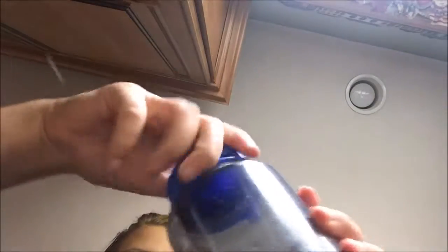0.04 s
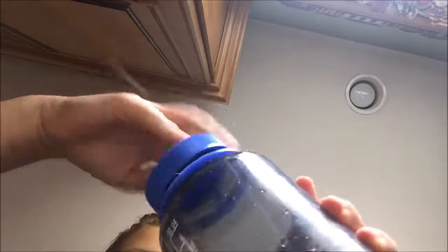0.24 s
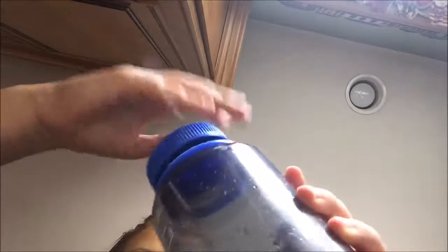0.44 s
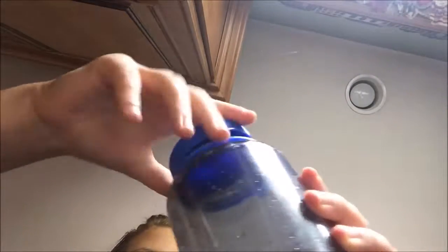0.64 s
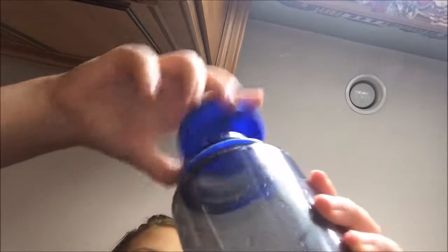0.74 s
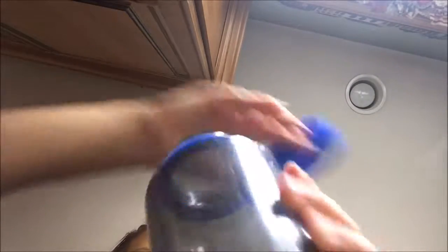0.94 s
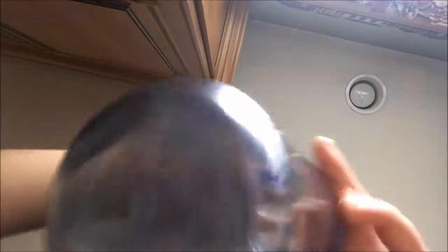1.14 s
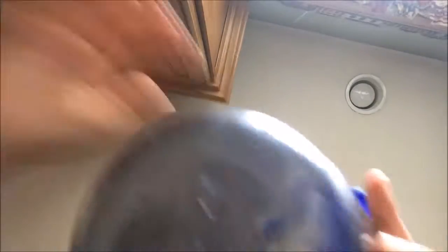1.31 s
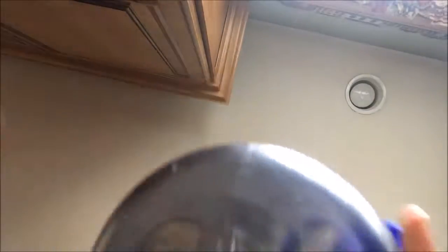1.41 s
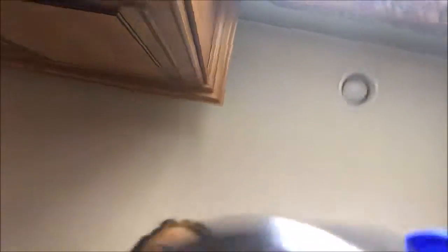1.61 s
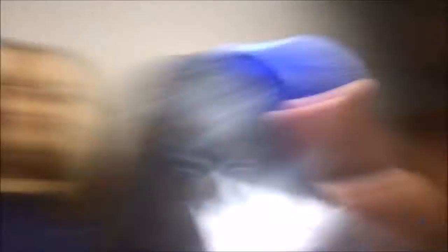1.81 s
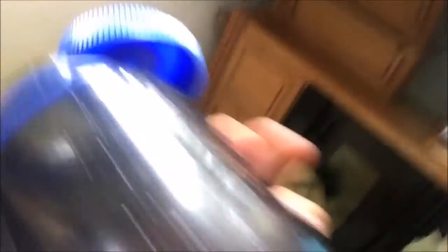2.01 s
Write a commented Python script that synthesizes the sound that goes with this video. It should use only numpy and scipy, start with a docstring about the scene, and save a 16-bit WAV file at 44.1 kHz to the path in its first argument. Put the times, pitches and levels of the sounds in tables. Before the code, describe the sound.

A plastic bottle cap twists and snaps open, then taps against the handled bottle.

```python
"""Sharp plastic clicks, close up in a kitchen: a hand unscrews the cap of a hard water bottle.
The thread rubs and drones, the cap snaps free, and the air in the open bottle rings with a hollow note.
The loose cap ticks and bounces on the bottle's wall; then the bottle is moved about,
with dull bumps, sliding fingers and a short stick-slip judder."""
import sys
import numpy as np
from scipy import signal
from scipy.fft import rfft, irfft, next_fast_len
from scipy.io import wavfile
from scipy.ndimage import map_coordinates

SR = 44100
rng = np.random.default_rng(int(sys.argv[2]) if len(sys.argv) > 2 else 0)


def store_wav(level_fs):
    """Save 16-bit WAV to argv[1]."""
    pcm = np.round(np.clip(np.atleast_2d(level_fs), -1, 1) * 32767)
    wavfile.write(sys.argv[1], SR, pcm.T.astype(np.int16))


N = 90449
T = np.arange(N) / SR
AGE = T[:SR // 3]  # seconds since a hit

# the cap catching on its thread (time [s], level [dB], treble [dB])
CLICKS = [(0.0229, -20, -1.5), (.0332, -10, 1.5), (0.11, -28.5, 10.5), (.110, -19.5, -0.5),
          (.1225, -36, 5.5), (0.1507, -27.5, -13), (0.2345, -20.5, -3), (0.2367, -17, -17),
          (0.3212, -32, 5), (.353, -28.5, -2), (.366, -29, -11.5), (0.3829, -19, -9.5), (.386, -16, -9.5),
          (.402, -24.5, -16), (0.43, -25.5, -15.5), (.458, -26, 1), (0.4926, -25.5, -9.5),
          (0.6657, -4.5, 1), (.675, -11.5, -5), (0.6862, -18.5, -4), (0.7956, -23.5, 3)]
# click EQ (frequency [Hz], gain [dB])
CLICK_EQ = [(60, -24.5), (190, -6), (320, -3), (650, -11.5), (1550, -0.5), (2900, -9.5), (3400, -18.5),
            (4600, -16.5), (8200, -29), (13500, -34), (16000, -41)]
# click tail (frequency [Hz], T60 [s])
CLICK_DECAY = [(200, 0.063), (12000, 0.07)]
# ring of the closed bottle (frequency [Hz], level [dB], T60 [s])
SHELL_MODES = [(1012, 6, 0.074), (1314, -11, 0.027), (1544, 4.5, 0.091), (1803, -5, .17), (2056, 0, 0.15),
               (2526, 1, 0.09), (4640, -3.5, 0.042)]
# thread friction (time [s], level [dB])
RUB_FADER = [(.28, -48), (.375, -45.5), (.405, -31), (.445, -57), (.53, -50.5), (.6, -79.5), (.66, -51),
             (.75, -48), (.85, -74.5)]
# friction EQ (frequency [Hz], gain [dB])
RUB_EQ = [(60, -25), (300, 4.5), (750, -4.5), (1500, 3), (2900, -5), (3500, -11), (6500, -9.5), (8500, -30)]
# the bottle droning under the turning cap (time [s], level [dB], pitch [Hz])
DRONE = [(.33, -52.5, 221), (.37, -36.5, 223.8), (.425, -35.5, 214.2), (.465, -45, 206.5), (.53, -39, 192),
         (.59, -58.5, 126.6), (.68, -46, 111), (.85, -88, 124)]
# taps of cap and strap (time [s], level [dB], low pitch [Hz], high pitch [Hz])
TICKS = [(0.1565, -25.5, 6340, 7000), (0.974, -46.5, 5900, 6500), (1.0263, -28.5, 1830, 6380),
         (1.0385, -22.5, 2650, 4200), (1.158, -41.5, 1870, 1950), (1.2308, -34, 1720, 2580),
         (1.2428, -38, 2430, 3980), (1.279, -29, 3020, 3950)]
# tick EQ (frequency [Hz], gain [dB])
TICK_EQ = [(1100, -9), (1600, 11), (2200, 1), (6800, -9), (8500, -17)]
# tail of struck plastic (frequency [Hz], T60 [s])
PLASTIC_DECAY = [(300, 0.1), (10000, 0.037)]
# handling bumps (time [s], level [dB], pitch [Hz], rise [s])
BUMPS = [(.162, -30.5, 163, 0.0046), (0.688, -30, 154.1, 0.0068), (1.689, -26.5, 78.7, 0.012),
         (1.7334, -11, 158, 0.0046)]
# EQ of the heaviest bump's thud (frequency [Hz], gain [dB])
THUD_EQ = [(60, -4), (300, -2), (560, 3), (1500, -33.5), (4000, -81)]
# air resonance of the bottle (time [s], level [dB])
NECK_FADER = [(.77, -64), (.805, -42.5), (.86, -46.5), (1.0, -83.5), (1.085, -55), (1.2, -80), (1.48, -41),
              (1.54, -56), (2.01, -63.5), (2.04, -39.5)]
# cap bounces (time [s], level [dB])
KNOCKS = [(1.3396, -16.5), (1.3857, -25.5), (1.435, -36), (1.4913, -42.5)]
# ring of the open bottle's wall (frequency [Hz], level [dB], T60 [s])
WALL_MODES = [(293.7, -0.5, 0.17), (934, -6.5, 0.076), (961, 4, 0.074), (1570, -13, 0.11), (1710, 0, 0.034),
              (1994, -8, 0.093), (2770, -11.5, 0.066), (3120, -30, 0.05)]
# knock EQ (frequency [Hz], gain [dB])
KNOCK_EQ = [(60, -42), (300, 6), (540, -13.5), (950, -5.5), (3500, -12.5), (4500, -32.5), (10000, -55)]
# sliding fingers (time [s], level [dB])
SLIDE_FADER = [(1.59, -98.5), (1.67, -40.5), (1.78, -67.5), (1.9, -42.5), (1.94, -76)]
# slide EQ (frequency [Hz], gain [dB])
SLIDE_EQ = [(30, 0.5), (80, 21), (950, -0.5), (1800, -17), (15000, -37)]
# brushes of the hand (time [s], half-length [s], level [dB])
SCRAPES = [(1.643, 0.022, -61.5), (1.862, .014, -56.5), (1.9, 0.013, -56.5)]
# brush EQ (frequency [Hz], gain [dB])
SCRAPE_EQ = [(2000, -8.5), (3300, 13.5), (6800, 4.5), (8500, -7)]
# slips of the shifted bottle (time [s], level [dB])
SLIPS = [(1.837, -24), (1.8437, -24), (1.85, -24.5), (1.865, -23.5), (1.871, -29)]
# ring of a slip (frequency [Hz], level [dB], T60 [s])
JUDDER_MODES = [(180, 2, 0.055), (608, 4, 0.035), (890, -4, 0.014)]
# slip EQ (frequency [Hz], gain [dB])
SLIP_EQ = [(50, -15), (180, 1.5), (900, 5), (1400, -6.5), (2900, -15.5), (10000, -61.5)]
# noise floor EQ (frequency [Hz], gain [dB])
FLOOR_EQ = [(25, -25), (72, 4.5), (300, 3.5), (3000, -19), (15500, -29)]
# reverb EQ (frequency [Hz], gain [dB])
ROOM_EQ = [(80, -10), (2000, -3), (14000, 3)]


def amp(db):
    """Decibels to gain."""
    return 10 ** (np.asarray(db) / 20)


def unit(x):
    """x at rms 1."""
    return x / np.sqrt(np.mean(x ** 2) + 1e-20)


def along(points, hz):
    """Read (frequency [Hz], value) points on a log axis."""
    f, v = np.transpose(points)
    return np.interp(np.log(hz + 1), np.log(f + 1), v)


def curves(rows):
    """An automation curve for each column after the time."""
    s, *cols = np.transpose(rows)
    return [np.interp(T, s, c) for c in cols]


def wobble(rate):
    """A smooth random curve, rate knots a second."""
    return map_coordinates(rng.standard_normal(N // 20), [T * rate], mode="wrap")


def equalise(x, eq):
    """Minimum-phase EQ from a table, or from a function of Hz giving dB."""
    m = 2 * next_fast_len(len(x))
    hz = np.fft.rfftfreq(m, 1 / SR)
    gain_db = eq(hz) if callable(eq) else along(eq, hz)
    cepstrum = irfft(np.log(amp(gain_db) + 1e-6))
    cepstrum[1:m // 2] *= 2
    cepstrum[m // 2 + 1:] = 0
    return irfft(rfft(x, m) * np.exp(rfft(cepstrum)))[:len(x)]


def shelves(x, bass_db, treble_db, bass_hz=700, treble_hz=3500):
    """Low and high shelving EQ."""
    below = lambda hz, corner: 1 / (1 + (hz / corner) ** 4)
    return equalise(x, lambda hz: bass_db * below(hz, bass_hz) + treble_db * (1 - below(hz, treble_hz)))


def noise(eq):
    """Steady coloured noise at rms 1."""
    return unit(equalise(rng.standard_normal(N), eq))


def noise_tail(decay, size):
    """Noise in which each frequency dies at its own speed."""
    hz, t, spectrum = signal.stft(rng.standard_normal(size), SR, nperseg=128)
    fade = amp(-60 * t / along(decay, hz)[:, None])
    return signal.istft(spectrum * fade, SR, nperseg=128)[1][:size]


def swell(rise_s):
    """An envelope that peaks at 1 after rise_s, then dies."""
    return AGE / rise_s * np.exp(1 - AGE / rise_s)


def contact(eq, decay, ring_db):
    """A sharp pulse, a crack of tiny slips and the dense ringing behind it."""
    pulse = equalise(1. * (AGE == 0), eq)
    crack = amp(-9.5) * swell(rise_s=0.00079) * rng.standard_normal(len(AGE))
    rough = equalise(crack + amp(ring_db) * noise_tail(decay, len(AGE)), eq)
    return pulse / abs(pulse).max() + 1.535 * rough / np.linalg.norm(pulse)


def ringing(modes, attack_s):
    """Damped modes, struck a little differently each time."""
    ring = 0
    for hz, db, t60 in modes:
        envelope = amp(db + 1.5 * rng.normal() - 60 * AGE / t60)
        detuned = hz * (1 + .004 * rng.normal())
        ring += envelope * np.sin(2 * np.pi * (detuned * AGE + rng.random()))
    return ring * (1 - np.exp(-AGE / attack_s))


def placed(events):
    """A track from (time [s], level [dB], sound) events."""
    track = np.zeros(N + SR)
    for s, db, sound in events:
        track[round(s * SR):][:len(sound)] += amp(db) * sound
    return track[:N]


def cap_clicks(flex_hz=1796, bass_trade=.33):
    """The cap flexes and jumps on its thread, ringing the closed bottle; dull clicks are fuller."""
    flex = amp(-6) * swell(rise_s=0.00073) ** 2 * np.cos(2 * np.pi * flex_hz * AGE)

    def snap():
        hit = amp(-1.5) * contact(CLICK_EQ, CLICK_DECAY, ring_db=-17.5)
        return flex + hit + amp(-23.5) * ringing(SHELL_MODES, attack_s=0.00028)
    return placed((s, db, shelves(snap(), -bass_trade * treble, treble)) for s, db, treble in CLICKS)


def thread_rub(grains_per_s=700, centre_hz=2550, spread_octaves=.55, ring_cycles=16):
    """Gritty friction in the thread: clumps of tiny pitched slips over hiss."""
    draws = rng.random((round(grains_per_s * N / SR), 2))
    pitches = centre_hz * 2 ** (spread_octaves * rng.standard_normal(len(draws)))
    t = AGE[:SR // 50]
    grain = lambda hz: np.sin(2 * np.pi * hz * t) * amp(-60 * hz * t / ring_cycles)
    grit = placed((when * N / SR, -10 * soft, grain(hz)) for (when, soft), hz in zip(draws, pitches))
    friction = unit(grit) + .7 * rng.standard_normal(N)
    clumps = amp(3 * wobble(rate=170))
    db, = curves(RUB_FADER)
    return amp(db) * unit(equalise(friction * clumps, RUB_EQ))


def cap_drone():
    """The turning cap draws a rough, sinking drone from the bottle."""
    db, hz = curves(DRONE)
    phase = 2 * np.pi * np.cumsum(hz) / SR
    partial = lambda k: wobble(130 * k) * np.sin(k * phase) + wobble(130 * k) * np.cos(k * phase)
    return amp(db) * unit(partial(1) + .45 * partial(2))


def cap_ticks(width_octaves=.25, skirt_db=-12, t60=.022):
    """Light taps; where it is touched, the cap rings mostly at two of its pitches."""
    away = lambda hz, centre: 1 - np.exp(-.5 * (np.log2((hz + 1) / centre) / width_octaves) ** 2)

    def tick(low, high):
        eq = lambda hz: along(TICK_EQ, hz) + skirt_db * away(hz, low) * away(hz, high)
        tap = amp(-5) * contact(eq, PLASTIC_DECAY, ring_db=-12)
        return tap + amp(-11) * ringing([(low, 0, t60), (high, 0, t60)], attack_s=.0003)
    return placed((s, db, tick(low, high)) for s, db, low, high in TICKS)


def handling_bumps(thud_s=1.7318, thud_db=-24.5):
    """The handled bottle gives low, round bumps, the heaviest layered with a soft thud."""
    bumps = [(s, db, swell(rise) ** 2 * np.sin(2 * np.pi * hz * AGE)) for s, db, hz, rise in BUMPS]
    thud = contact(THUD_EQ, decay=[(300, 0.061)], ring_db=-2.5)
    return placed(bumps + [(thud_s, thud_db, thud)])


def neck_note(open_hz=292, capped_drop_hz=47, lift_s=0.66, glide_s=0.0354):
    """The hollow note of the air in the bottle, rising as the cap clears the neck."""
    db, = curves(NECK_FADER)
    gain = amp(db + 1.5 * wobble(rate=50))
    hz = open_hz - capped_drop_hz * np.exp(-np.maximum(T - lift_s, 0) / glide_s)
    hz += 7 * wobble(rate=50)
    return gain * unit(np.sin(2 * np.pi * np.cumsum(hz) / SR))


def cap_knocks(dulling=0.56, low_cut_hz=150):
    """The hanging cap bounces on the open bottle's wall; softer bounces are duller."""
    blow = lambda: ringing(WALL_MODES, attack_s=0.0015) + contact(KNOCK_EQ, PLASTIC_DECAY, ring_db=-8)
    hardest = max(db for s, db in KNOCKS)
    wall = placed((s, db, shelves(blow(), 0, dulling * (db - hardest), treble_hz=1600))
                  for s, db in KNOCKS)
    return signal.sosfilt(signal.butter(2, low_cut_hz, "highpass", fs=SR, output="sos"), wall)


def finger_slide():
    """Fingers slide over the plastic with a dark, uneven rustle."""
    db, = curves(SLIDE_FADER)
    return amp(db + 2.5 * wobble(rate=90)) * noise(SLIDE_EQ)


def skin_swish():
    """Soft, high scrapes of skin on plastic."""
    return noise(SCRAPE_EQ) * sum(amp(db) * np.exp(-((T - s) / width) ** 2) for s, width, db in SCRAPES)


def judder():
    """The shifted bottle sticks and slips in a quick stutter."""
    hit = lambda: contact(SLIP_EQ, PLASTIC_DECAY, ring_db=-13)
    return placed((s, db, hit() + amp(-0.5) * ringing(JUDDER_MODES, attack_s=0.00069)) for s, db in SLIPS)


def kitchen_reverb(send, build_s=0.0053):
    """The kitchen's short echo; the lows hang longest."""
    tail = noise_tail(decay=[(150, 1), (2000, 0.46), (14000, 0.25)], size=SR)
    tail *= 1 - np.exp(-np.arange(SR) / SR / build_s)
    return equalise(signal.fftconvolve(send, tail / np.linalg.norm(tail))[:N], ROOM_EQ)


def scene():
    """The mono mix over a faint noise floor; knocks and handling sit closer and drier than the cap."""
    cap = cap_clicks() + thread_rub() + cap_drone() + cap_ticks()
    knocks = cap_knocks()
    handling = handling_bumps() + judder() + finger_slide() + skin_swish()
    floor = amp(-62.5) * noise(FLOOR_EQ)
    reverb = amp(-15) * kitchen_reverb(cap + amp(-4) * knocks + amp(-14) * handling)
    return (cap + knocks + handling + neck_note() + reverb + floor)[None]


def record(dry, low_cut_hz=37, top_hz=16500):
    """The small microphone loses deep bass, and the very top is rolled off."""
    thin = signal.sosfilt(signal.butter(2, low_cut_hz, "highpass", fs=SR, output="sos"), dry)
    m = next_fast_len(N + SR // 2)
    rolloff = np.clip((top_hz - np.fft.rfftfreq(m, 1 / SR)) / 900, 0, 1) ** 2
    return irfft(rfft(thin, m) * rolloff, m)[:, :N]


dry = scene()
out = record(dry)
store_wav(out)
```